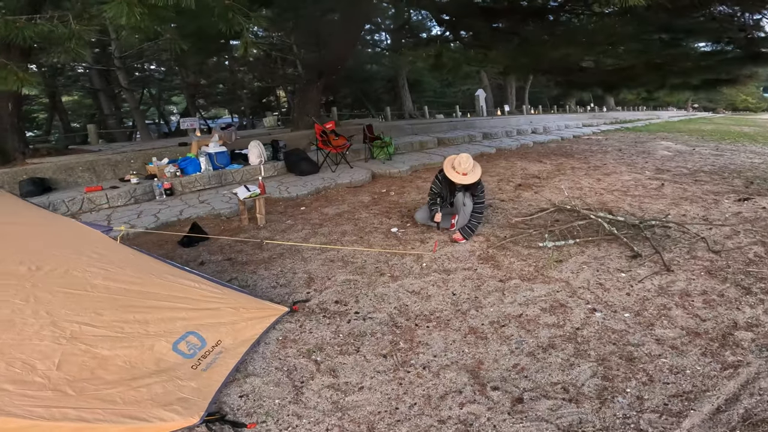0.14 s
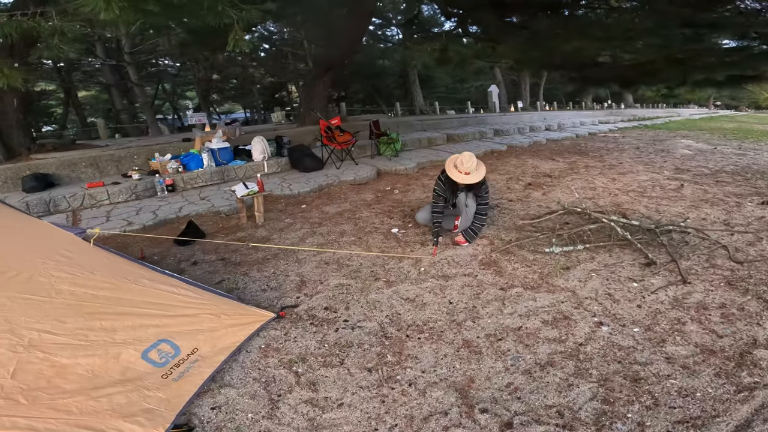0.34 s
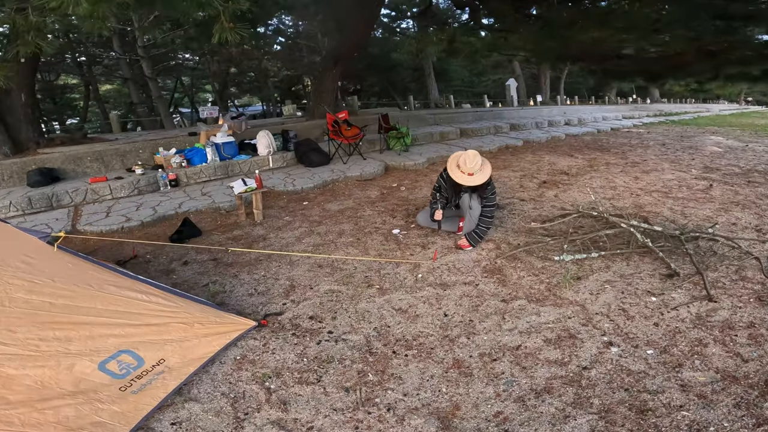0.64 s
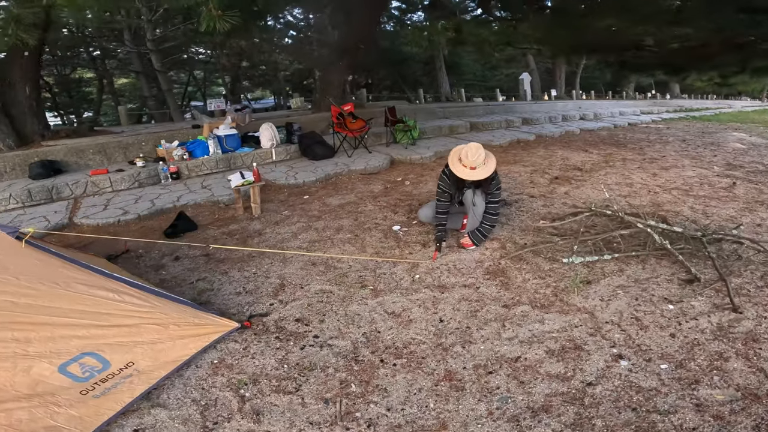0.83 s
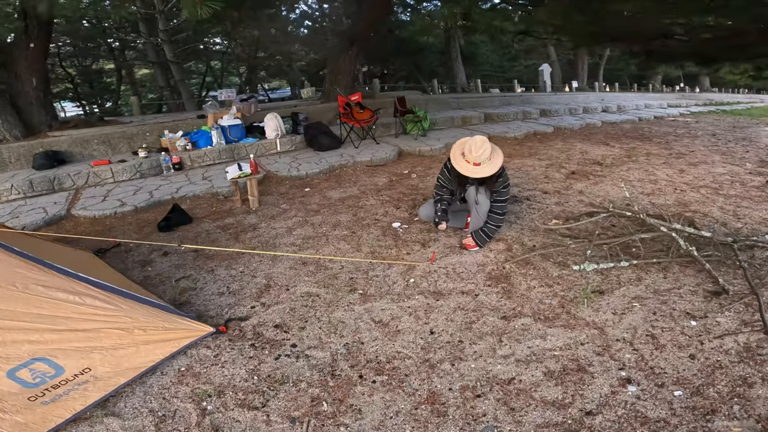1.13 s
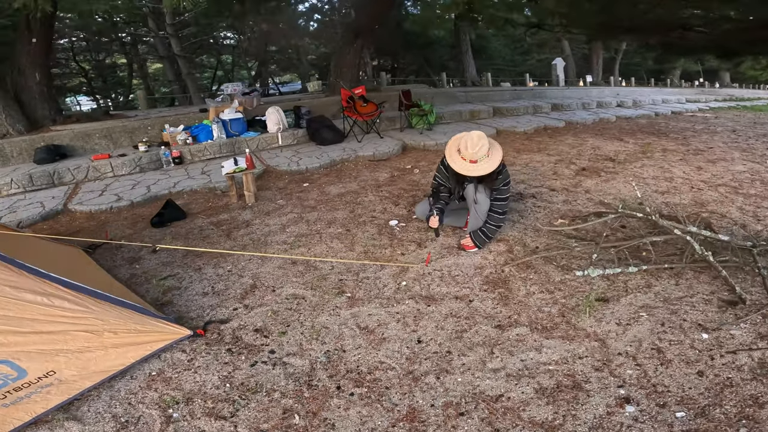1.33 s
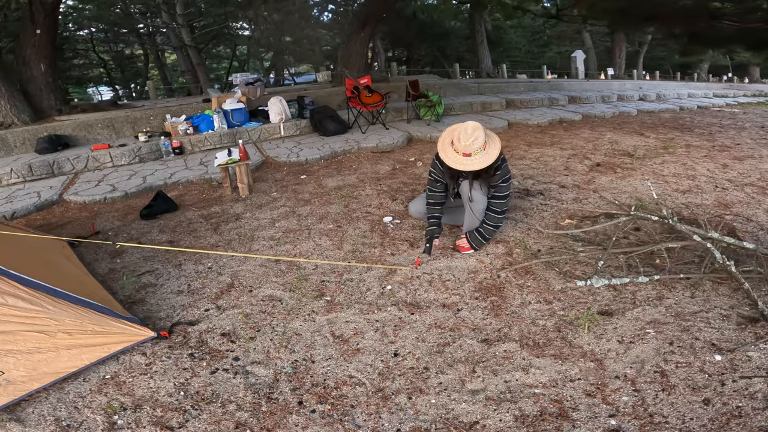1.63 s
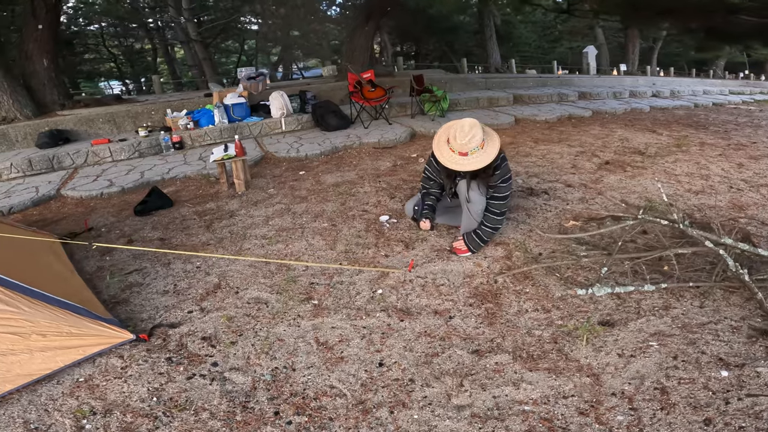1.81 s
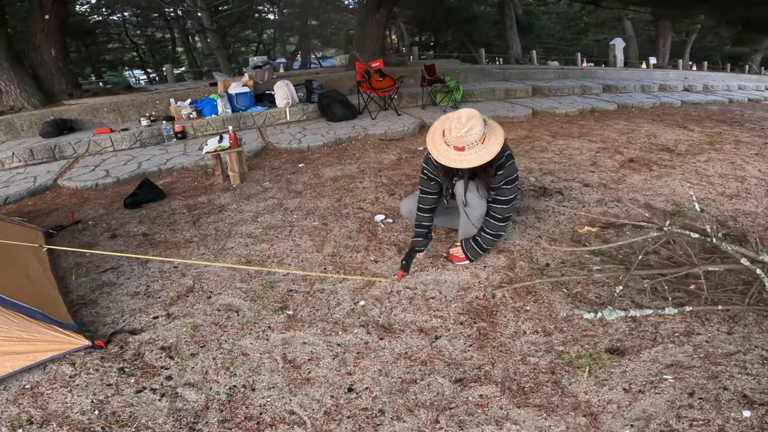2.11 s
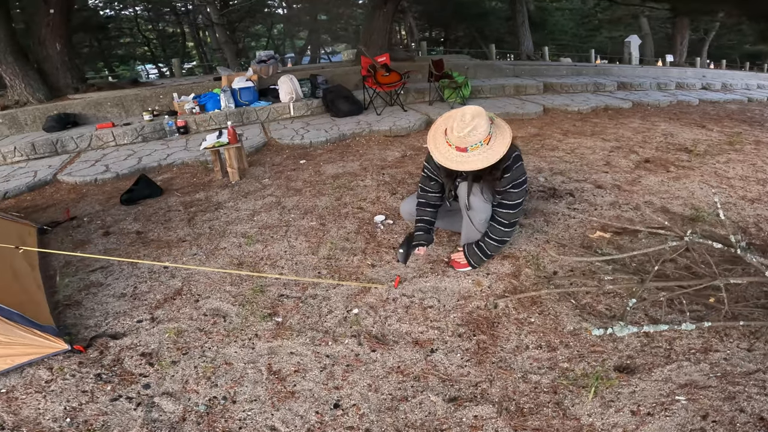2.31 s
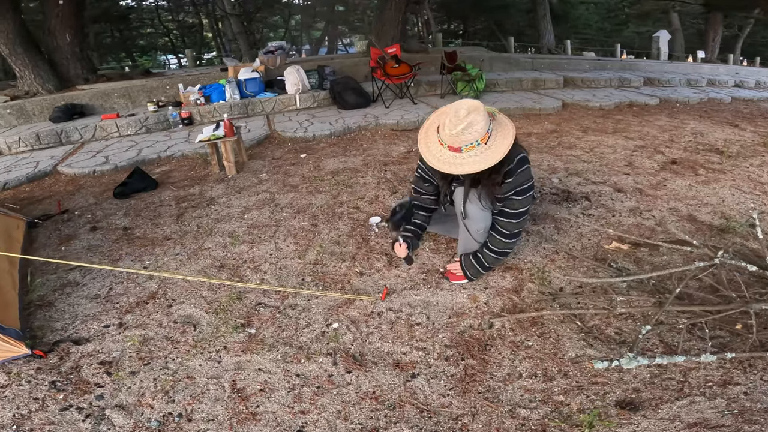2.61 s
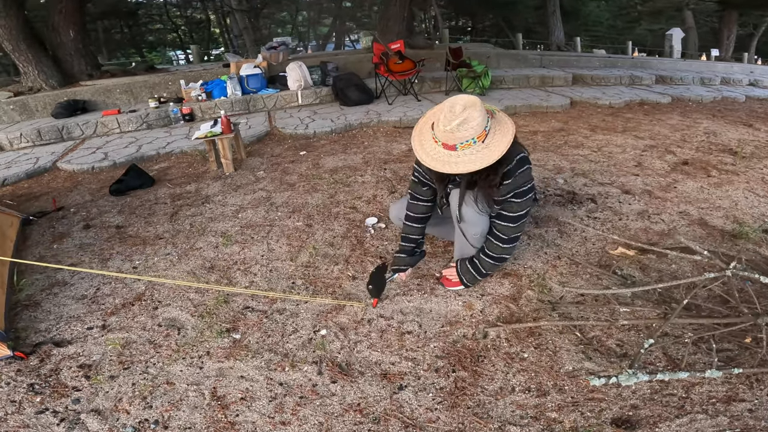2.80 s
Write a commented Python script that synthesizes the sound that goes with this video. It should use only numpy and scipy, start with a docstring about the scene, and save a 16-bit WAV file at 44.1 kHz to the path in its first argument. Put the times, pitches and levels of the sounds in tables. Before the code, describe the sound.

A hammer strikes a steel tent stake five times, with sharp clinks and dull thuds.

```python
"""Light wind, a distant hush and ticks of grit, twigs and pine needles at a wooded campsite.
From 0.4 s, a few metres away, a steel hammer drives a tent stake into packed soil: five blows.
Each is a crack and a clink that the soil chokes at once, then a falling thud through the ground.
Stone steps and trees echo the steel."""
import sys
import numpy as np
from scipy import signal
from scipy.fft import rfft, irfft, next_fast_len
from scipy.io import wavfile
from scipy.ndimage import uniform_filter1d, map_coordinates

SR = 44100
rng = np.random.default_rng(int(sys.argv[2]) if len(sys.argv) > 2 else 0)


def persist_wave(psi):
    """Save psi, clipped to +-1, as 16-bit WAV."""
    counts = np.round(np.clip(psi, -1, 1) * 32767).astype(np.int16)
    wavfile.write(sys.argv[1], SR, np.atleast_2d(counts).T)


N = 130095


def undb(db):
    return 10 ** (np.asarray(db) / 20)


def noise(size):
    return rng.standard_normal(size)


def fade(t, t60_s):
    """Exponential decay, 60 dB down at t60_s."""
    return np.exp(-np.log(1000) * np.maximum(t, 0) / t60_s)


def colour(x, curve):
    """Minimum-phase filter through (freq_hz, gain_db) points, scaled to unit power gain."""
    size = next_fast_len(2 * len(x), real=True)
    size += size % 2
    freq_hz, gain_db = np.array(curve, float).T
    bin_hz = np.fft.rfftfreq(size, 1 / SR)
    gain = undb(np.interp(np.log(bin_hz + 1), np.log(freq_hz), gain_db))
    cepstrum = irfft(np.log(gain / np.sqrt(np.mean(gain ** 2))))
    cepstrum[1:size // 2] *= 2
    cepstrum[size // 2 + 1:] = 0
    return irfft(rfft(x, size) * np.exp(rfft(cepstrum)))[:len(x)]


def drift(rate_hz):
    """Slow random drift, spread near 1."""
    hold = int(SR / rate_hz)
    return uniform_filter1d(np.repeat(noise(N // hold + 1), hold), hold)[:N]


def add(track, start_s, sound):
    i = int(start_s * SR)
    track[i:i + len(sound)] += sound[:N - i]


def hush():
    """Low wind rumble and the distant wash of the woods."""
    # slow swells: time_s, gain_db
    swells = [(0, -2.5), (.22, -3), (.35, 0.5), (.75, -2.5), (1.0, 2.5), (1.45, -3), (1.65, 5), (2.0, -4),
              (2.35, 0.5), (2.65, -4), (2.95, 2)]
    # wind and woods spectrum: freq_hz, gain_db
    spectrum = [(20, -3), (43, -1.5), (81, -6.5), (110, -18), (200, -24.5), (270, -33.5), (450, -36),
                (700, -40), (1100, -33.5), (1700, -33.5), (3300, -42.5), (7300, -49.5), (9000, -65),
                (12500, -56.5), (16000, -94)]
    base_db, waver_db = -39, 0.5
    swell_db = np.interp(np.arange(N) / SR, *np.array(swells).T)
    level_db = base_db + swell_db + waver_db * drift(rate_hz=5.87)
    return undb(level_db) * colour(noise(N), spectrum)


def hush_side():
    """Stereo side of the hush: the wash is wider than the rumble."""
    rumble_cut = signal.butter(2, 160, "high", fs=SR, output="sos")
    wash = signal.sosfilt(rumble_cut, hush())
    return undb(-9) * wash + undb(-18) * hush()


def crunch(envelope, centre_hz, width_oct=0.67):
    """Uneven grains of grit in a broad resonance, duller at the top."""
    spread_db, grain_samples = 4, 32
    skirt_db, dull_db, dull_above_hz = -21.5, -7, 8400
    size = len(envelope)
    grains = noise(size)
    grains *= undb(spread_db * np.repeat(noise(size // grain_samples + 1), grain_samples)[:size])
    hz = np.geomspace(50, 16000, 60)
    resonance = np.exp(-.5 * (np.log2(hz / centre_hz) / width_oct) ** 2)
    skirt = undb(skirt_db) / (1 + (hz / 7000) ** 2)
    shelf_db = dull_db * np.clip((hz - dull_above_hz) / 800, 0, 1)
    gain_db = 20 * np.log10(resonance + skirt) + shelf_db
    return colour(grains * envelope, np.c_[hz, gain_db])


def litter():
    """Sharp ticks and soft scuffs on dry ground."""
    # grit and twig ticks: start_s, level_db, centre_hz, t60_s
    ticks = [(0.043, -46.5, 1310, 0.044), (0.334, -42, 2750, .05), (0.464, -35, 870, 0.023),
             (0.544, -46, 3300, 0.036), (0.828, -38, 1620, 0.029), (1.028, -19.5, 3370, 0.0096),
             (1.131, -35, 1360, 0.021), (1.140, -34.5, 2690, .05), (1.251, -40.5, 6000, .03),
             (1.503, -49, 2160, 0.15), (1.919, -43, 1320, 0.019), (1.930, -43, 970, 0.027),
             (2.083, -50.5, 2500, 0.016), (2.13, -35, 2700, 0.019), (2.153, -41, 2890, 0.034),
             (2.209, -61, 1980, 0.028), (2.309, -41.5, 3150, 0.046), (2.752, -37.5, 2550, 0.032),
             (2.774, -49, 2570, 0.11)]
    # scuffs and rustles: middle_s, sigma_s, level_db, centre_hz, width_oct
    scuffs = [(0.084, 0.029, -56, 770, 0.76), (0.4, 0.031, -41.5, 930, 1.23),
              (0.486, 0.043, -49.5, 344, 1.37), (1.104, 0.085, -51, 443, 1.4),
              (1.324, 0.077, -59, 6000, 0.32), (1.759, 0.043, -45, 600, 1.86),
              (1.91, 0.085, -58.5, 837, .5), (2.19, 0.081, -53, 1390, 1.03), (2.392, 0.056, -50, 500, 2)]
    t = np.arange(N) / SR
    out = np.zeros(N)
    for start_s, level_db, centre_hz, t60_s in ticks:
        envelope = fade(t[:int(.7 * SR)], t60_s)
        add(out, start_s, undb(level_db) * crunch(envelope, centre_hz))
    for middle_s, sigma_s, level_db, centre_hz, width_oct in scuffs:
        envelope = np.exp(-.5 * ((t - middle_s) / sigma_s) ** 2)
        out += undb(level_db) * crunch(envelope, centre_hz, width_oct)
    return out


def needles(t):
    """Dry pine needles crackle faintly at random."""
    rate_per_s = 14
    envelope = np.zeros(N)
    for position, strength in rng.random((int(rate_per_s * N / SR), 2)):
        add(envelope, position * (N - 1) / SR, strength * fade(t, t60_s=0.013))
    return undb(-51.5) * crunch(envelope, centre_hz=5510)


def ring(t, modes, pitch_ratio):
    """Decaying modes of alternating sign, excited a little differently by each blow."""
    scatter_db = -0.3 * noise(len(modes))
    out = np.zeros(len(t))
    for k, (nominal_hz, level_db, t60_s) in enumerate(modes):
        envelope = undb(level_db + scatter_db[k]) * fade(t, t60_s)
        out += (-1) ** k * envelope * np.sin(2 * np.pi * nominal_hz * pitch_ratio * t)
    return out


def clink(t, stake_ratio, hammer_db, snap_db, rebound_s):
    """Steel on steel: choked stake, ringing head, snap and grit, repeated by a quick rebound."""
    # stake modes: nominal_hz, level_db, t60_s
    stake_modes = [(1267, -16.5, 0.017), (1650, -19.5, 0.016), (2064, -22, 0.013), (2340, -30.5, 0.067),
                   (2780, -22.5, 0.0145), (3318, -14, 0.0208), (3519, -8, 0.023), (4560, -20.5, 0.017),
                   (4750, -20, 0.015), (5725, -27, 0.02), (7600, -17.5, 0.01)]
    # hammer head modes: nominal_hz, level_db, t60_s
    hammer_modes = [(3970, -12, 0.022), (7970, -29, 0.029), (4070, -41.5, 0.15)]
    # heavily damped contact mode: nominal_hz, level_db, t60_s
    snap_mode = [(2660, -3.1, 0.0027)]
    # grit crushed against the stake: freq_hz, gain_db
    crack_spectrum = [(200, -3), (700, -11), (1200, -2), (3000, 0.5), (5000, -13), (8000, -14), (9200, -18),
                      (12000, -10.5), (16000, -25.5)]
    # microphone colour, treble dulls steeply above 8.2 kHz: freq_hz, gain_db
    mic_colour = [(8200, 1.5), (9200, -7), (12500, -9), (14000, -14.5), (16000, -22)]
    contact_s, choke_start_s, rebound_db = .0002, .004, -6
    soil_choke = fade(t - choke_start_s, t60_s=.03)
    stake = ring(t, stake_modes, stake_ratio) * soil_choke
    hammer = undb(hammer_db) * ring(t, hammer_modes, pitch_ratio=0.99)
    snap = undb(snap_db) * ring(t, snap_mode, pitch_ratio=0.99)
    crack = undb(-17) * colour(noise(len(t)) * fade(t, t60_s=0.025), crack_spectrum)
    strike = (stake + hammer + snap + crack) * np.minimum(t / contact_s, 1)
    rebound = undb(rebound_db) * map_coordinates(strike, [(t - rebound_s) * SR])
    return undb(-4) * colour(strike + rebound, mic_colour)


def thud(t, gain_db, end_hz):
    """Ground wave: higher pitches arrive first, and the soil shudders after it."""
    # shaken soil: freq_hz, gain_db
    soil_spectrum = [(30, -19.5), (70, 2.5), (130, 1.5), (210, 2.5), (290, -13.5), (380, -10.5),
                     (520, -17.5), (1000, -44.5)]
    start_hz, glide_s, rise_s, base_db = 330.4, .0075, 0.011, -8
    pitch_hz = end_hz + (start_hz - end_hz) * np.exp(-t / glide_s)
    envelope = (1 - np.exp(-(t / rise_s) ** 2)) * fade(t, t60_s=0.14)
    wave = undb(base_db + gain_db) * envelope * np.cos(2 * np.pi * np.cumsum(pitch_hz) / SR)
    shudder = undb(-22.5) * colour(noise(len(t)) * fade(t, t60_s=0.19), soil_spectrum)
    return wave + shudder


def echoes(x, t):
    """Early scatter off the stone steps and a faint long tail from the trees."""
    # echo colour: freq_hz, gain_db
    spectrum = [(100, 1.5), (400, 3), (800, 4.5), (1500, -3), (2800, 0), (3500, -5), (4050, 4.5), (4600, 1),
                (6000, -3.5), (7800, 2), (9500, 1.5), (12500, -1), (15000, -16)]
    lag_s, steps_db, woods_db = 0.015, -15.5, -23.5
    steps = (t > lag_s) * fade(t - lag_s, t60_s=0.165)
    woods = (t > lag_s) * fade(t, t60_s=0.55)
    steps *= undb(steps_db) / np.linalg.norm(steps)
    woods *= undb(woods_db) / np.linalg.norm(woods)
    response = colour(noise(len(t)) * np.hypot(steps, woods), spectrum)
    return signal.fftconvolve(x, response)[:N]


def scene():
    """Steel and crackle just right of centre, thuds central, echoes and hush wide."""
    # hammer blows: start_s, clink_db, stake_ratio, hammer_db, snap_db, rebound_s,
    # thud_db, thud_end_hz, echo_db
    blows = [(0.4037, -0.3, .995, -1.5, 3.5, 0.0023, -6.5, 62, 0.5),
             (0.983, 0.44, 1.012, -0.5, 4.5, 0.0027, -8, 56.4, 3),
             (1.6160, 3, 1.03, -6.5, -1.2, 0.0026, -5, 58, -1),
             (2.2479, 5.5, .988, -6, -5, .00278, -0.5, 50.9, -5),
             (2.8780, 3.5, .994, 6, 1.2, .00221, -2.5, 52, -9)]
    balance_db, left_lag_s = 0.5, .00002
    t = np.arange(int(.7 * SR)) / SR
    steel, echo_send, ground = np.zeros((3, N))
    for start_s, clink_db, stake_ratio, hammer_db, snap_db, rebound_s, thud_db, end_hz, echo_db in blows:
        blow = undb(clink_db) * clink(t, stake_ratio, hammer_db, snap_db, rebound_s)
        add(steel, start_s, blow)
        add(echo_send, start_s, undb(echo_db) * blow)
        add(ground, start_s, thud(t, thud_db, end_hz))
    near = steel + litter() + needles(t)
    delayed = map_coordinates(near, [np.arange(N) - left_lag_s * SR], mode="nearest")
    direct = np.array([undb(-balance_db / 2) * delayed, undb(balance_db / 2) * near])
    mid = ground + echoes(echo_send, t) + hush()
    # fresh noise in each call decorrelates the side
    side = undb(-9.5) * echoes(echo_send, t) + undb(-17) * litter() + hush_side()
    return direct + np.array([mid + side, mid - side])


def record(dry):
    """Clip at full scale, then cut the top."""
    top_hz = 16200
    lowpass = signal.ellip(8, .2, 70, top_hz, fs=SR, output="sos")
    return signal.sosfilt(lowpass, np.clip(dry, -1, 1))


dry = scene()
out = record(dry)
persist_wave(out)
```